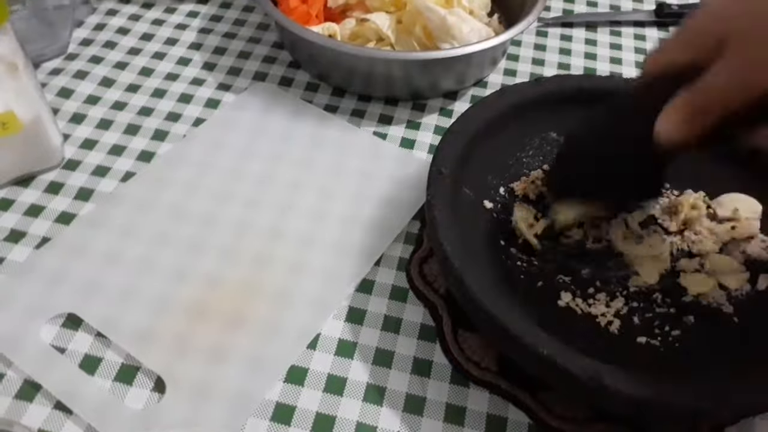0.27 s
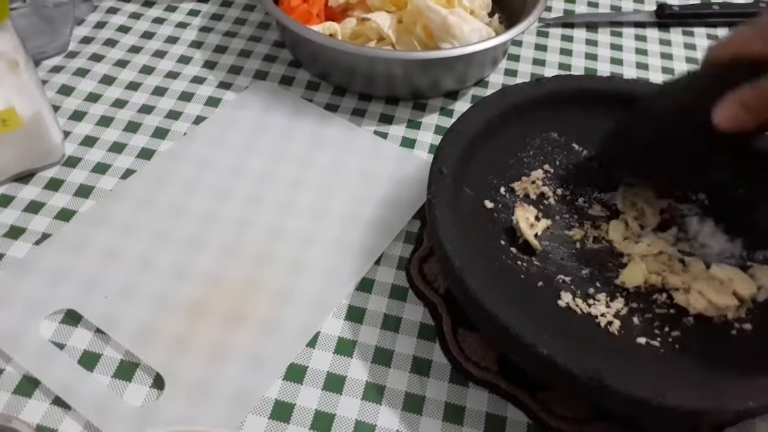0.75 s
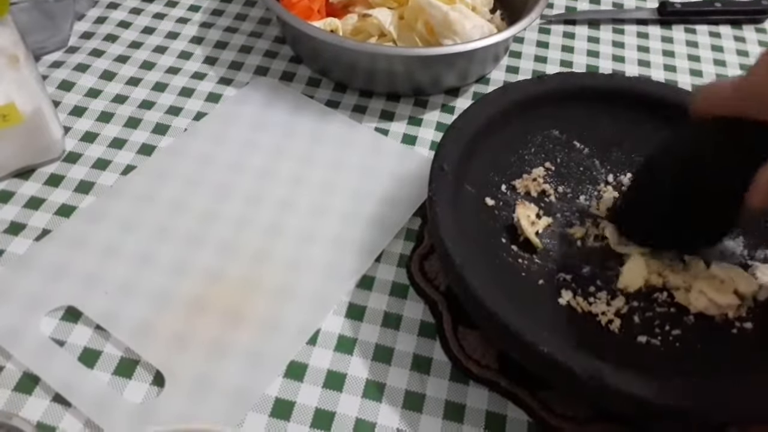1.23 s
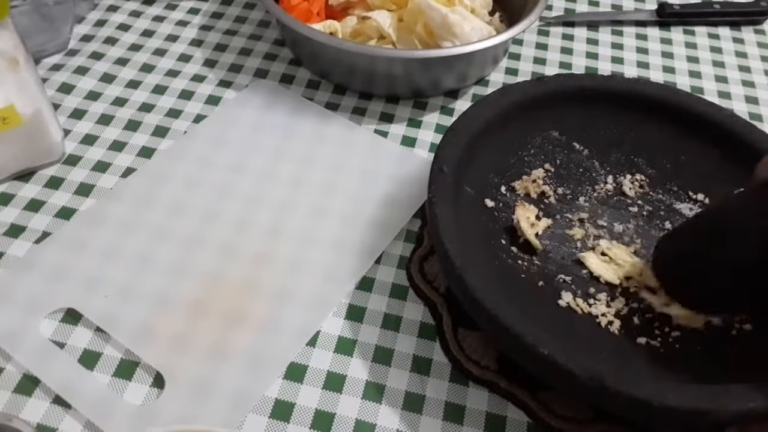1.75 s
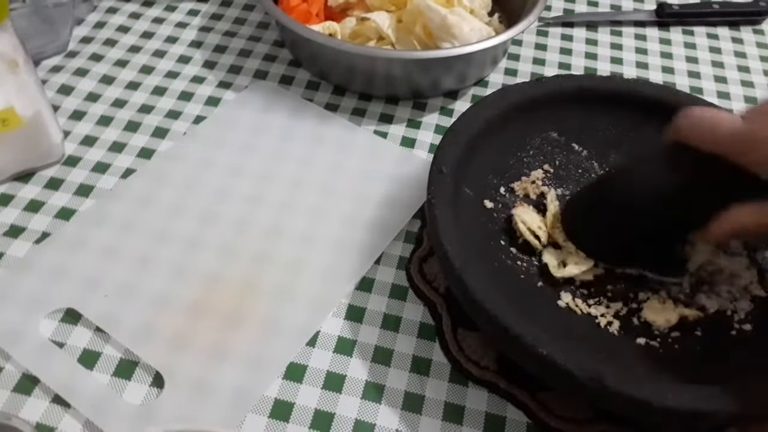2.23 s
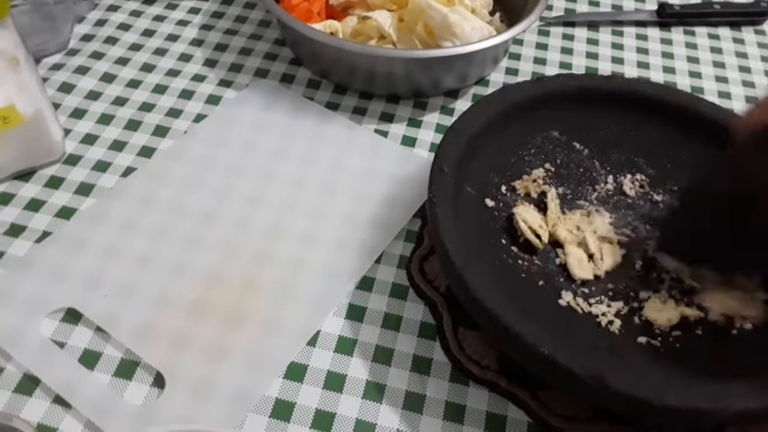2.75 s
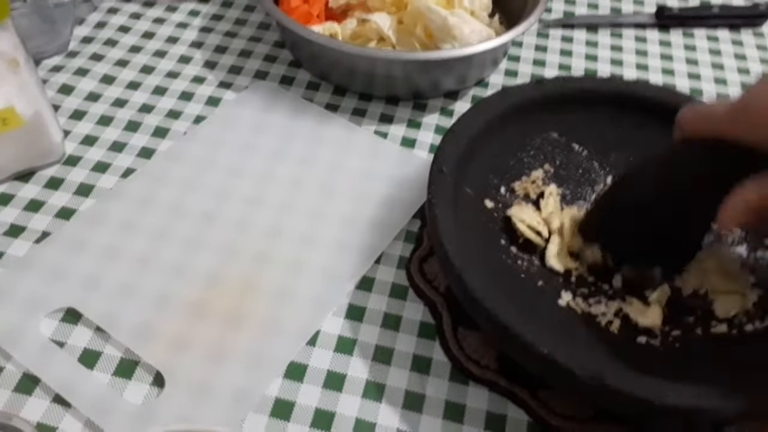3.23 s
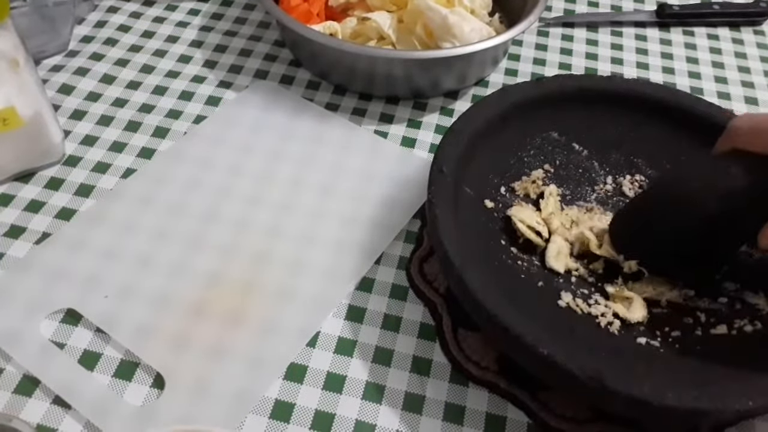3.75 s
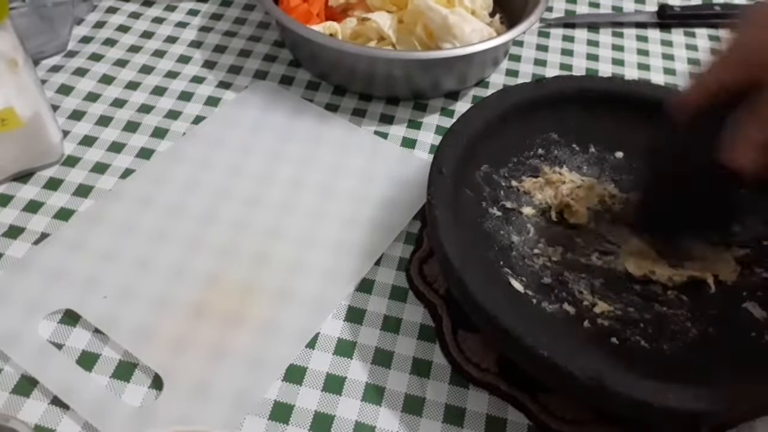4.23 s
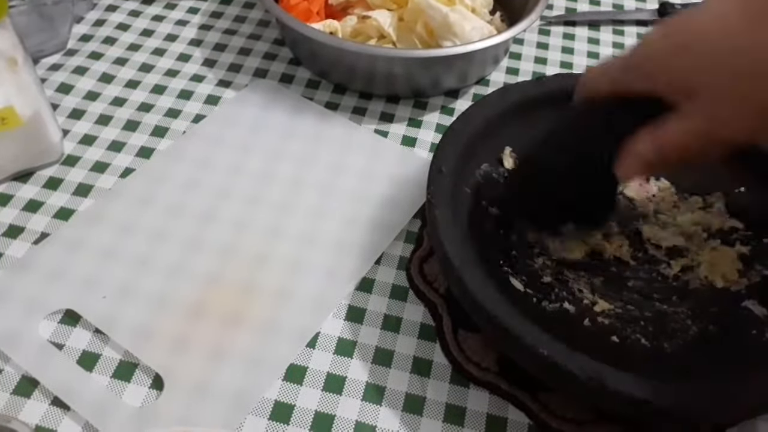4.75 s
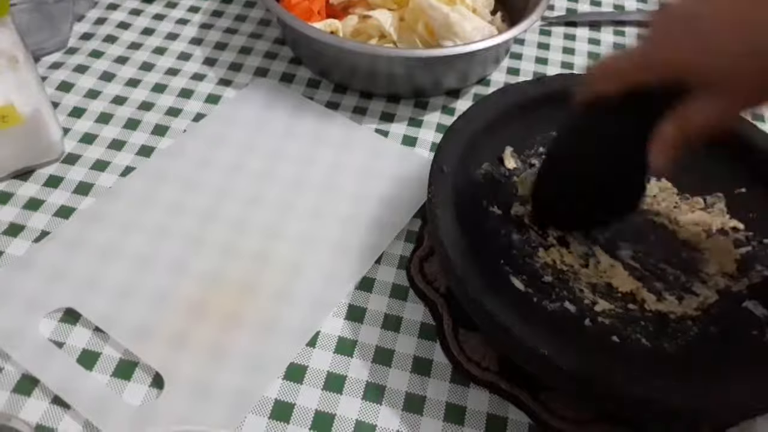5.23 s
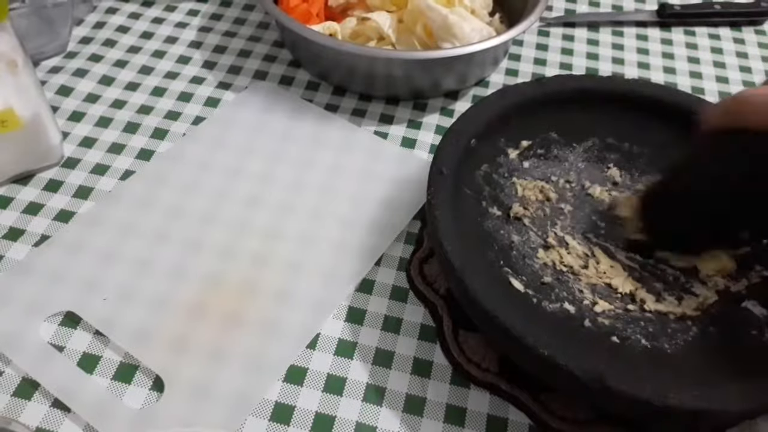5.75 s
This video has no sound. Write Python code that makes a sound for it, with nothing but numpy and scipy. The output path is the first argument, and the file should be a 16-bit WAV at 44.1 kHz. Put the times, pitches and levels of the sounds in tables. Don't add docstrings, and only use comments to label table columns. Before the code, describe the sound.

Small close microphone, mono and thin in the bass. Irregular strokes of stone on stone: clear pestle knocks first, firm stamps with bright bowl ring, then gritty drags with crisp crunching and dull thuds through paste. It nearly stops past the middle, then grinding returns with a sharp double-bouncing drop near the end and a final sliding scrape. Faint hiss and wavering low hum lie beneath.

```python
import sys
import numpy as np
from scipy import signal
from scipy.fft import rfft, irfft, next_fast_len
from scipy.io import wavfile

SR = 44100
rng = np.random.default_rng(int(sys.argv[2]) if len(sys.argv) > 2 else 0)


def gain_from_db(level_db):
    decades = np.asarray(level_db, float) / 20
    return 10 ** decades


def file_out(sig):
    cols = np.atleast_2d(sig).T
    lim = np.clip(cols, -1, 1)
    pcm = np.round(lim * 32767).astype(np.int16)
    wavfile.write(sys.argv[1], SR, pcm)


N = 264159

# peak t/s, swell t/s, fade t/s, stone level/dB, spice level/dB
DRAGS = [(.153, 0.039, 0.042, -52, -67), (.935, 0.0053, 0.087, -62, -67),
         (1.325, 0.064, 0.056, -61.5, -63.5), (1.55, 0.068, .06, -63.5, -67.5),
         (1.986, 0.034, 0.07, -50.5, -64), (2.135, 0.076, 0.071, -54.5, -60),
         (2.432, 0.028, 0.079, -42.5, -75), (2.455, .12, .03, -58, -76), (2.692, 0.035, 0.051, -59, -55.5),
         (2.83, .1, 0.039, -60.5, -82), (2.95, 0.08, 0.09, -62.5, -52), (3.081, 0.065, .085, -55, -59.5),
         (3.217, 0.058, 0.041, -52, -52.5), (3.385, 0.039, 0.11, -58.5, -74), (4.24, 0.1, 0.03, -63, -54),
         (4.35, 0.057, 0.054, -54.5, -60.5), (4.46, 0.048, 0.063, -54.5, -49.5),
         (5.04, .12, 0.12, -62.5, -56), (5.14, .05, 0.099, -57, -53.5), (5.265, 0.079, 0.072, -68, -57.5),
         (5.625, 0.063, 0.1, -58.5, -54)]
# peak t/s, swell t/s, fade t/s, stone level/dB, spice level/dB
SLIPS = [
    (.75, 0.022, 0.039, -50.5, -61.5),
    (.895, 0.045, .045, -63.5, -74),
    (1.69, 0.088, .1, -58.5, -67.5),
    (2.53, 0.06, 0.014, -61, -84),
    (2.85, 0.096, 0.035, -60, -67),
    (3.46, 0.2, 0.054, -67.5, -78),
    (4.885, 0.18, 0.07, -56, -60.5),
    (5.48, 0.035, 0.11, -60.5, -57),
    (5.81, 0.075, 0.028, -51.5, -68),
]
# peak t/s, swell t/s, fade t/s, stone level/dB, spice level/dB
SWEEPS = [(4.405, 0.033, .03, -80, -66), (.005, 0.0076, 0.017, -75, -65),
          (.075, 0.073, 0.048, -72.5, -62.5), (.278, 0.1, 0.064, -71, -60.5),
          (1.41, 0.058, 0.1, -76, -67.5), (1.772, 0.025, 0.12, -68, -55.5),
          (1.888, 0.075, 0.084, -67.5, -53.5), (1.946, .02, 0.081, -71, -46),
          (2.275, 0.12, .11, -69.5, -55.5), (2.59, 0.077, 0.088, -67, -46), (3.24, .03, 0.23, -87, -85),
          (3.59, 0.11, 0.11, -76, -54.5), (3.62, .03, 0.043, -70, -52), (3.72, .09, 0.026, -86, -76),
          (3.77, .03, 0.21, -94, -89), (4.52, 0.042, 0.16, -88, -93), (4.668, 0.075, 0.079, -63, -56),
          (4.777, 0.077, 0.056, -77, -53.5), (5.3, 0.12, 0.061, -62.5, -57), (5.72, .04, .05, -71, -74),
          (5.88, 0.16, 0.13, -66, -60.5), (5.94, 0.092, 0.03, -77, -59)]
# t/s, fade t/s, stone level/dB, spice level/dB
DROPS = [
    (.466, 0.11, -55, -55),
    (.7, 0.12, -48.5, -79),
    (.851, 0.016, -58, -83),
    (1.125, 0.097, -56, -60.5),
    (4.607, 0.078, -61.5, -80),
    (5.405, 0.073, -41, -61.5),
]
# t/s, fade t/s, stone level/dB, spice level/dB
STAMPS = [
    (1.058, 0.072, -43.5, -59),
    (1.217, 0.066, -47, -96),
    (1.438, 0.032, -41.5, -57),
    (1.822, 0.026, -78, -57),
    (4.916, 0.075, -56.5, -55.5),
]
# pestle ring level/dB, bowl drag level/dB, coarse spice level/dB
DRAG_SHARE = (-7, 0, -8.5)
SLIP_SHARE = (0, -11.5, -6)
SWEEP_SHARE = (-4.2, -3, -9)
DROP_SHARE = (0, -12.5, -3.5)
STAMP_SHARE = (-11, 0, -3)


def gestures():
    landing_s = 0.002
    drops = [(s, landing_s, *rest) for s, *rest in DROPS]
    stamps = [(s, landing_s, *rest) for s, *rest in STAMPS]
    kinds = [(DRAGS, DRAG_SHARE), (SLIPS, SLIP_SHARE), (SWEEPS, SWEEP_SHARE),
             (drops, DROP_SHARE), (stamps, STAMP_SHARE)]
    strokes = []
    for moves, (ring_db, bowl_db, coarse_db) in kinds:
        for peak_s, swell_s, fade_s, stone_db, spice_db in moves:
            levels_db = (stone_db + ring_db, stone_db + bowl_db, spice_db + coarse_db, spice_db)
            strokes.append((peak_s - swell_s, swell_s, fade_s, *levels_db))
    return in_time(strokes)


# f/Hz, width f/Hz, level/dB
BOWL_MODES = [(3980, 320, -49), (5236, 93, 2.5), (5295, 85, -1), (5535, 120, 5), (5820, 140, -27),
              (5780, 420, -19), (8600, 260, -8.5), (8960, 360, -9.5), (13800, 800, -17)]
# f/Hz, width f/Hz, level/dB
RASP_ZONES = [(710, 480, 1), (1200, 750, 1), (1880, 900, 2), (2790, 1400, 2), (3580, 1800, 1),
              (5500, 2900, -3)]
# f/Hz, level/dB per Hz
RASP_SPECTRUM = [(500, -7.5), (900, 1.5), (1500, -0.5), (2500, -5.5), (4000, -11.5), (8000, -46),
                 (16000, -49)]


def drag(bowl_db, ring_db):
    contacts = grit(per_s=2300.0, spread_db=4.0, clump_db=-0.5, clump_hz=60.0)
    ring = rms_one(wander(contacts, BOWL_MODES, wander_db=3.0, wander_hz=27.0))
    turning = wander(contacts, RASP_ZONES, wander_db=3.5, wander_hz=8.6)
    rasp = rms_one(colour(turning, RASP_SPECTRUM))
    rasp_level = np.hypot(gain_from_db(bowl_db - 5.5), gain_from_db(ring_db - 2.0))
    return gain_from_db(bowl_db) * ring + rasp_level * rasp


# f/Hz, width f/Hz, level/dB
PESTLE_MODES = [(2180, 150, 1), (2520, 34, 0.5), (2592, 46, 14), (2645, 36, 20.5), (2775, 500, 11),
                (6300, 250, 7.5), (9660, 580, -24.5), (13900, 270, -29)]


def pestle(ring_db):
    taps = grit(per_s=1400.0, spread_db=-3.5, clump_db=2.5, clump_hz=51.0)
    return played(ring_db, taps, lambda x: resonate(x, PESTLE_MODES))


# f/Hz, level/dB per Hz
COARSE_SPECTRUM = [(900, -46), (2500, -14), (4000, -5.5), (7500, 0), (9500, -2.5), (12000, -21.5)]
# f/Hz, level/dB per Hz
FINE_SPECTRUM = [(6000, -20.5), (9000, -8.5), (13000, -4), (15700, -6), (16500, -33.5)]


def crunch(coarse_db, fine_db):
    snaps = gain_from_db(-11.0) * rms_one(grit(per_s=200.0, spread_db=3.2, clump_db=2.5, clump_hz=15.0))
    coarse = rms_one(grit(per_s=4600.0, spread_db=3.5, clump_db=3.0, clump_hz=38.3))
    fine = rms_one(grit(per_s=24000.0, spread_db=7.5, clump_db=2.0, clump_hz=50.0))
    dull = gain_from_db(coarse_db + 3.0) * rms_one(colour(coarse + snaps, COARSE_SPECTRUM))
    bright = gain_from_db(fine_db) * rms_one(colour(fine + snaps, FINE_SPECTRUM))
    return dull + bright


# t/s, low mode level/dB, upper mode level/dB, snap level/dB
PESTLE_KNOCKS = [(.465, -36, -45.5, -57), (0.4863, -37, -45.5, -65), (0.4927, -41.5, -47, -67),
                 (0.6996, -25.5, -49, -56), (0.7045, -36, -76, -78), (0.7409, -39.5, -60, -65),
                 (.85, -56.5, -69, -68), (3.3106, -69, -70.5, -69.5), (4.6042, -78, -75, -77),
                 (5.4049, -28, -72, -67), (5.428, -34.5, -42.5, -60), (5.46, -60, -72, -60),
                 (5.7703, -48, -77, -74)]
# t/s, low mode level/dB, upper mode level/dB, snap level/dB
BOWL_KNOCKS = [(0.134, -58.5, -65, -84), (0.934, -59, -76, -61), (1.059, -45, -42.5, -39),
               (1.065, -45, -40, -41.5), (1.0788, -66, -57, -62), (1.0984, -57, -62, -54),
               (1.1243, -43, -46.5, -43), (1.1487, -62, -56, -61), (1.2176, -40, -42.5, -43),
               (1.3179, -75, -73, -67), (1.4359, -44.5, -44, -42.5), (1.5214, -75, -61, -67),
               (1.9874, -52, -39.5, -41.5), (2.426, -48, -65, -65), (2.788, -72, -58, -75),
               (2.917, -70, -80, -68), (3.159, -81, -82, -59), (3.2021, -63, -47, -43),
               (4.327, -61, -57, -76), (4.439, -53, -66, -68), (5.244, -77, -81, -66)]
# t/s, snap level/dB
CRACKS = [(0.241, -66), (0.511, -47.5), (1.7533, -59), (1.8214, -49), (1.8756, -51.5), (1.913, -56),
          (1.938, -53), (2.2264, -78), (2.568, -54), (2.575, -45), (3.5578, -62), (3.719, -68),
          (3.7774, -76), (4.297, -70), (4.558, -73), (5.226, -64), (5.6725, -51)]


def blows():
    pestle_hz, bowl_hz, spread_hz = 5960, 5543, 60
    cracks = [(s, snap_db - 36, snap_db - 27, snap_db) for s, snap_db in CRACKS]
    rows = [(*row, bowl_hz) for row in BOWL_KNOCKS]
    rows += [(*row, pestle_hz) for row in PESTLE_KNOCKS + cracks]
    return [(*row, hz + spread_hz * rng.standard_normal()) for *row, hz in rows]


def hits():
    out, thumps = np.zeros(N + SR), np.zeros(N)
    t = np.arange(SR // 20) / SR
    bright = signal.butter(1, 2500.0, "high", fs=SR, output="sos")
    for s, low_db, upper_db, snap_db, upper_hz in blows():
        noise = signal.sosfilt(bright, rng.standard_normal(len(t)))
        low = gain_from_db(low_db + 7.5 - 60 * t / 0.017) * np.sin(2 * np.pi * 2670.0 * t)
        upper = gain_from_db(upper_db + 11.5 - 60 * t / 0.023) * np.sin(2 * np.pi * upper_hz * t)
        snap = gain_from_db(snap_db + 11.0 - 60 * t / 0.0062)
        scatter = gain_from_db((snap_db + upper_db) / 2 - 5.0 - 60 * t / 0.03)
        at = round(s * SR)
        out[at:at + len(t)] += low + upper + noise * (snap + scatter)
        thumps[at] = gain_from_db(low_db + 28.5)
    body = TABLE_MODES + MORTAR_MODES + [(1580, 460, -35.5), (3100, 760, -17.0)]
    return out[:N] + resonate(thumps + 1e-18, body)


# t/s, peak level/dB
THUDS = [(0.853, -42), (0.91, -30), (1.64, -45), (2.94, -15), (3.198, -16.5), (3.462, -35.5), (4.165, -52),
         (4.333, -36), (4.605, -29), (4.926, -27.5), (5.806, -38)]


def thuds():
    pushes = np.zeros(N)
    for s, peak_db in THUDS:
        pushes[round(s * SR)] = gain_from_db(peak_db + 29.5)
    soft = np.exp(-2 * np.pi * 510.0 / SR)
    pushes = signal.lfilter([1 - soft], [1, -soft], pushes + 1e-18)
    return resonate(pushes, TABLE_MODES + MORTAR_MODES)


# peak t/s, length t/s, table top level/dB, mortar body level/dB
JOLTS = [(.005, 0.22, -70, -67.5), (.478, 0.15, -41.5, -54), (.701, 0.028, -31.5, -36.5),
         (.735, 0.12, -45.5, -46.5), (.852, 0.029, -43, -51), (.91, 0.19, -46, -59),
         (.951, 0.043, -44, -50.5), (1.1, 0.18, -53, -52.5), (1.218, 0.048, -43, -43),
         (1.44, 0.046, -76, -43.5), (1.521, 0.11, -55.5, -53.5), (1.65, 0.22, -46, -50),
         (1.826, 0.061, -52, -59), (1.875, 0.18, -66, -60.5), (2.51, .25, -48, -46.5),
         (2.69, 0.085, -53, -51), (2.81, 0.12, -48.5, -43.5), (2.93, 0.092, -39.5, -44),
         (3.065, 0.16, -50.5, -45.5), (3.19, 0.093, -40, -38), (3.68, 0.28, -68.5, -84),
         (4.168, 0.046, -55.5, -75), (4.325, .12, -44, -49), (4.436, 0.12, -49.5, -49.5),
         (4.61, 0.089, -46, -53), (4.68, 0.15, -55.5, -61.5), (4.93, 0.046, -47, -54),
         (5.015, 0.49, -63, -58), (5.244, 0.075, -50.5, -42), (5.42, 0.21, -44, -47.5)]
# peak t/s, length t/s, table top level/dB, mortar body level/dB
LEANS = [(.175, 0.091, -57.5, -53), (.3, 0.2, -66, -66), (1.072, 0.046, -35.5, -33),
         (1.32, 0.12, -58.5, -51.5), (1.99, 0.089, -48, -40.5), (2.145, 0.13, -55.5, -45.5),
         (2.3, 0.16, -56, -49), (2.45, 0.11, -57, -49.5), (3.45, 0.22, -50, -54), (3.62, 0.16, -52, -58),
         (3.78, .044, -90, -68.5), (3.843, 0.047, -62, -69.5), (4.245, 0.11, -56.5, -55),
         (4.88, 0.22, -49.5, -42), (5.155, 0.1, -46, -46), (5.655, 0.13, -50, -50.5),
         (5.81, .12, -45.5, -44), (5.89, 0.19, -55, -59)]


def weight():
    strokes = []
    for rows, share in [(JOLTS, 0.19), (LEANS, 0.65)]:
        for peak_s, length_s, *levels_db in rows:
            swell_s = share * length_s
            strokes.append((peak_s - swell_s, swell_s, (1 - share) * length_s, *levels_db))
    return in_time(strokes)


# f/Hz, width f/Hz, level/dB
TABLE_MODES = [(152.5, 28.7, -4.5), (195.8, 21.5, 6), (268.3, 42.5, 0.5)]
# f/Hz, width f/Hz, level/dB
MORTAR_MODES = [(344.5, 83, -1.5), (383.4, 27, 2), (417.1, 14, -4.5), (516.7, 40.3, -2), (539, 23.4, -3),
                (602.7, 22.5, -2), (714.6, 27, -9), (843, 71, -11.5), (1016, 15, -19), (1289, 35, -16.5)]


def table(top_db, body_db):
    bumps = grit(per_s=1200.0, spread_db=1.5, clump_db=4.0, clump_hz=25.0)
    floor_cut = signal.butter(2, 140.0, "high", fs=SR, output="sos")

    def top(x):
        return signal.sosfilt(floor_cut, resonate(x, TABLE_MODES))

    def body(x):
        return signal.sosfilt(floor_cut, wander(x, MORTAR_MODES, wander_db=3.5, wander_hz=8.0))

    return played(top_db, bumps, top) + played(body_db, bumps, body)


# f/Hz, level/dB per Hz
AIR_SPECTRUM = [(35, -45.5), (60, -14.5), (161, -8), (199, -9.5), (366, -20), (442, -11), (659, -14.5),
                (1190, -21), (1370, -13.5), (1690, -21.5), (1990, -21), (2240, -22), (16500, -39.5)]


def room_tone():
    hum_hz = 203 + 6.0 * drift(12.0)
    hum = np.sin(2 * np.pi * np.cumsum(hum_hz) / SR) * gain_from_db(1.5 * drift(6.0))
    air = rms_one(colour(rng.standard_normal(N), AIR_SPECTRUM))
    return gain_from_db(-73.5) * air + gain_from_db(-72) * hum


def in_time(strokes):
    t, power = np.arange(N) / SR, 1e-14
    for s, swell_s, fade_s, *levels_db in strokes:
        swell = np.sin(np.pi / 2 * np.clip((t - s) / max(swell_s, 1 / SR), 0, 1))
        fade = np.cos(np.pi / 2 * np.clip((t - s - swell_s) / max(fade_s, 1 / SR), 0, 1))
        power = power + np.outer(gain_from_db(np.array(levels_db)) ** 2, (swell * fade) ** 4)
    settle_s, settle_db = 0.023, -16.5
    r = np.exp(-1 / (settle_s * SR))
    settling = signal.lfilter([1 - r], [1, -r], power)
    return 10 * np.log10(power + gain_from_db(settle_db) ** 2 * settling)


def grit(per_s, spread_db, clump_db, clump_hz):
    sizes = gain_from_db(spread_db * np.minimum(rng.exponential(1, N), 4)) * rng.choice([-1, 1], N)
    born = rng.random(N) < per_s / SR
    return sizes * born * gain_from_db(clump_db * drift(clump_hz)) + 1e-18


def resonate(x, modes):
    out = 0
    for k, (hz, width_hz, level_db) in enumerate(modes):
        r = np.exp(-np.pi * width_hz / SR)
        gain = (1 - r * r) / 2 * gain_from_db(level_db) * (-1) ** k
        poles = [1, -2 * r * np.cos(2 * np.pi * hz / SR), r * r]
        out = out + signal.lfilter([gain, 0, -gain], poles, x)
    return out


def wander(x, modes, wander_db, wander_hz):
    out = 0
    for k, mode in enumerate(modes):
        moving = x * gain_from_db(wander_db * drift(wander_hz))
        out = out + (-1) ** k * resonate(moving, [mode])
    return out


def played(level_db, drive, body):
    return body(gain_from_db(level_db) * drive) / np.sqrt(np.mean(body(drive) ** 2))


def colour(x, spectrum):
    size = next_fast_len(N)
    hz, level_db = np.transpose(spectrum)
    grid = np.arange(size // 2 + 1) * SR / size + 1
    gain = gain_from_db(np.interp(np.log(grid), np.log(hz), level_db))
    return irfft(rfft(x, size) * gain, size)[:N]


def drift(rate_hz):
    r = np.exp(-2 * np.pi * rate_hz / SR)
    slow = signal.lfilter([1], [1, -2 * r, r * r], rng.standard_normal(N + SR))
    return rms_one(slow[SR:])


def rms_one(x):
    return x / np.sqrt(np.mean(x ** 2) + 1e-20)


def scene():
    ring_db, drag_db, coarse_db, fine_db = gestures()
    top_db, body_db = weight()
    grind = drag(drag_db, ring_db) + pestle(ring_db) + crunch(coarse_db, fine_db)
    mortar = grind + hits() + thuds() + table(top_db, body_db)
    bass_cut = signal.butter(2, 70.0, "high", fs=SR, output="sos")
    top_cut = signal.cheby2(20, 45, 16000.0, fs=SR, output="sos")
    return signal.sosfilt(top_cut, signal.sosfilt(bass_cut, mortar) + room_tone())[None]


def band_limit(x):
    return signal.sosfilt(signal.butter(12, 16810, fs=SR, output="sos"), x)


def record(dry):
    mix = dry - 0.0002
    return band_limit(mix)


dry = scene()
out = record(dry)
file_out(out)
```